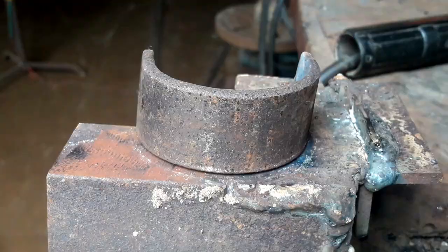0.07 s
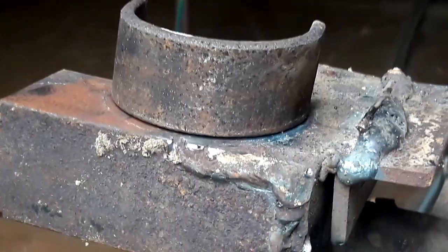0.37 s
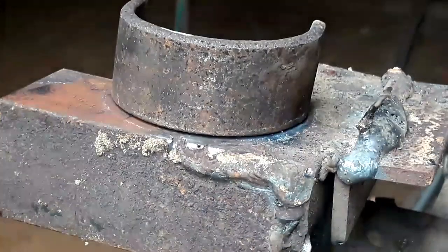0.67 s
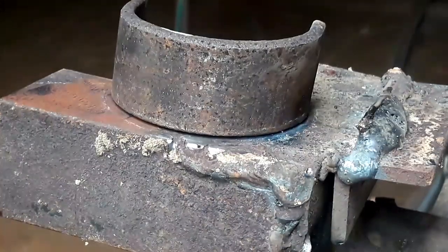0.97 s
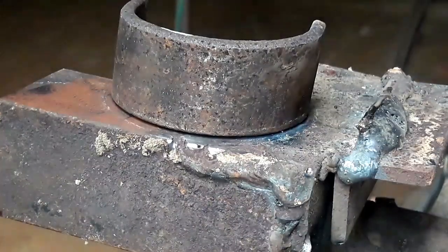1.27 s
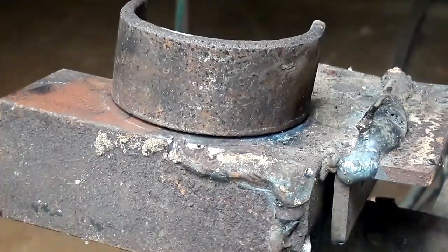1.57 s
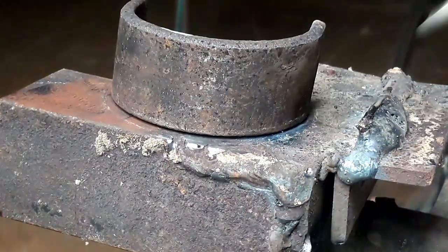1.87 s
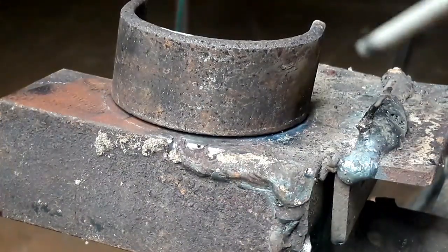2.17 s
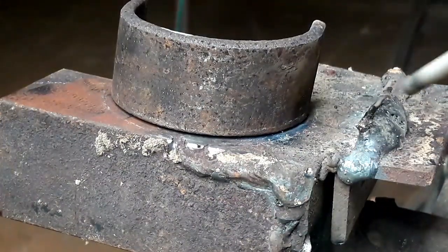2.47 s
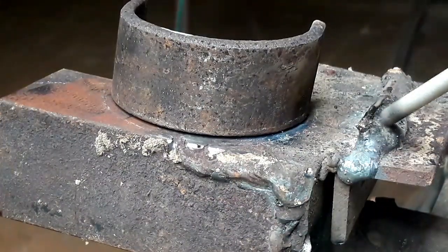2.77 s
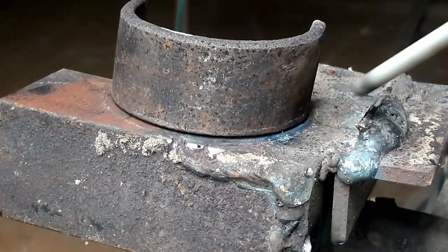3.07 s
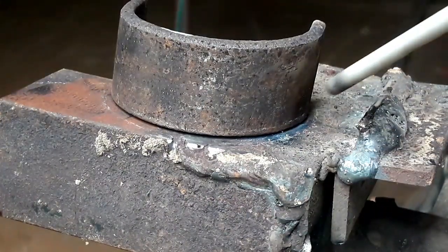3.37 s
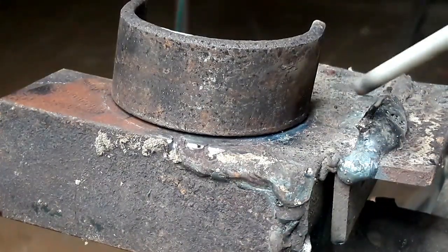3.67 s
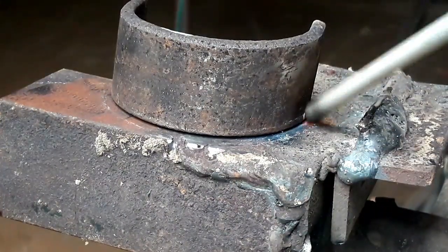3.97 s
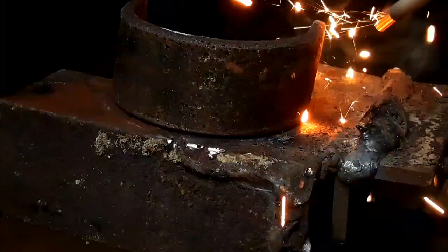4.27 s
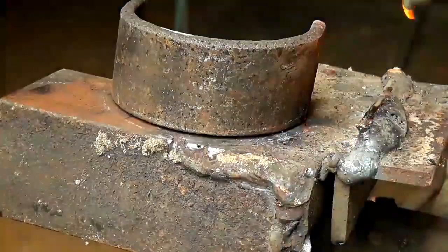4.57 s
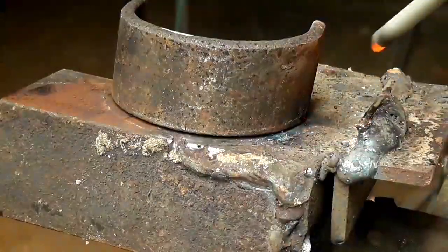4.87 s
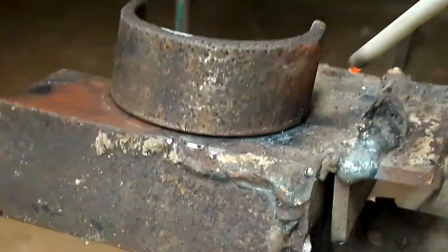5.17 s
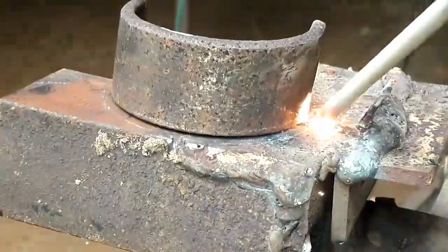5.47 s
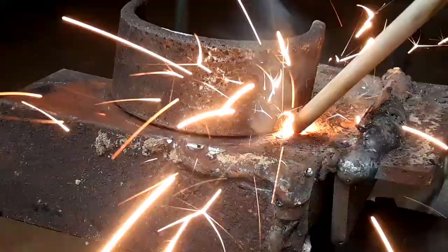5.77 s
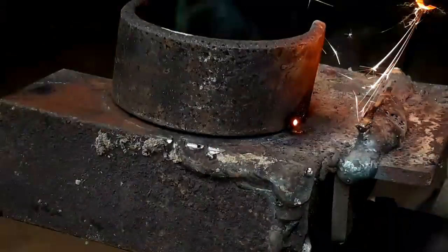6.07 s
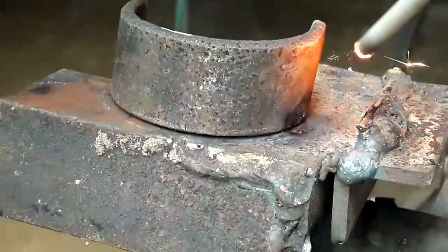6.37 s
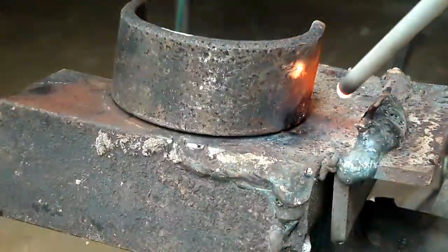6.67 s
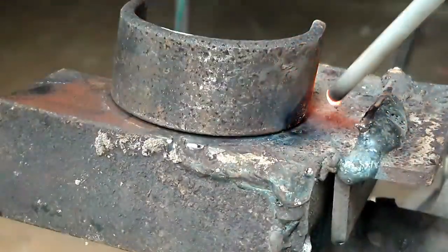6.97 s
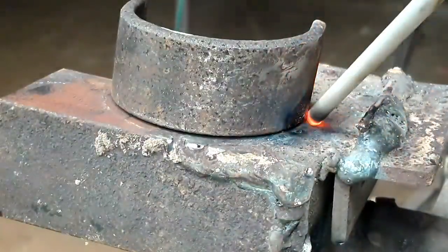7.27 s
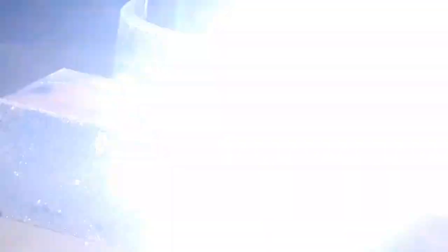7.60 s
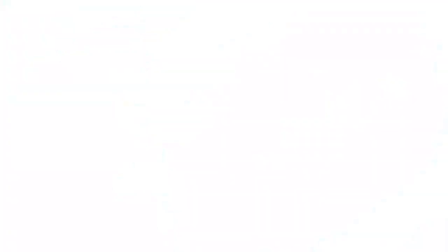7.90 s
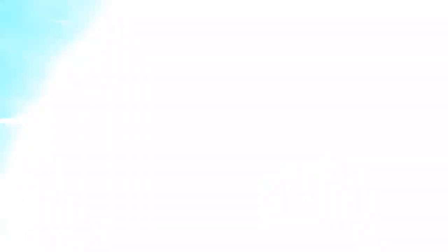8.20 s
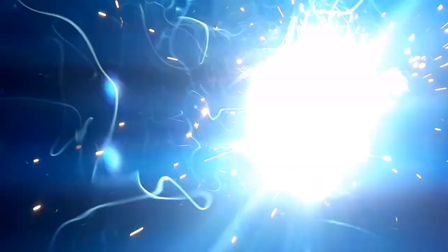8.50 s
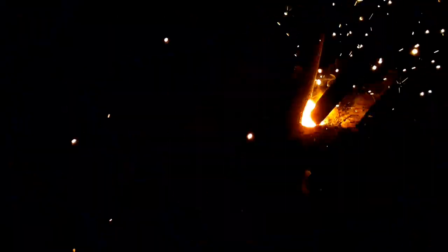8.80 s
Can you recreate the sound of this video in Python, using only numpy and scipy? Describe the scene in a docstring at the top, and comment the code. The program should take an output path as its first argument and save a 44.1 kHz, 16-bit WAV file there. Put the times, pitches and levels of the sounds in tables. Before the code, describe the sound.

Over a welding machine's fan whine and low rumble, an electrode clicks on metal, sputters twice, then crackles steadily.

```python
"""Stick welding in a workshop.

An electrode taps a steel joint; the arc flares and dies twice, then catches and sizzles.
The arc is a spray of tiny sparks, with single cracks and the thump of molten bridges blowing apart.
Behind it the welder's fan whines over a throbbing rumble and two dull bumps.
An automatic gain control sinks after each loud strike, holds for about a second and comes back."""
import sys
import numpy as np
from scipy import signal
from scipy.fft import rfft, irfft, next_fast_len
from scipy.io import wavfile
from scipy.ndimage import uniform_filter1d, minimum_filter1d

SR = 44100
rng = np.random.default_rng(int(sys.argv[2]) if len(sys.argv) > 2 else 0)


def inscribe(sig):
    """Save sig as 16-bit PCM at rate SR to the path in sys.argv[1].

    A 1-D sig is mono; a 2-D sig holds one channel per row.
    Samples are clipped to [-1, 1] before scaling.
    """
    pcm = np.round(np.clip(np.atleast_2d(sig).T, -1, 1) * 32767)
    wavfile.write(sys.argv[1], SR, pcm.astype(np.int16))


N = 398663
TIME = np.arange(N) / SR


def gain_of(db):
    """Decibels to amplitude."""
    return 10 ** (np.asarray(db) / 20)


def unit_rms(x):
    """Scales to rms 1."""
    return x / np.sqrt(np.mean(x ** 2) + 1e-20)


def envelope(points):
    """Amplitude over time from rows of time_s, level_db."""
    return gain_of(np.interp(TIME, *np.transpose(points)))


def at_hz(points, hz):
    """Interpolates on a log-frequency axis."""
    freq_hz, value = np.transpose(points)
    return np.interp(np.log(hz + 1), np.log(freq_hz + 1), value)


def add(mix, start_s, sound):
    """Mixes a sound in at start_s."""
    part = mix[round(start_s * SR):][:len(sound)]
    part += sound[:len(part)]


def filtered(x, hz, kind, order=2):
    """Butterworth low- or high-pass."""
    return signal.sosfilt(signal.butter(order, hz, kind, fs=SR, output="sos"), x)


def noise(spectrum):
    """Steady shaped noise, rms 1."""
    size = next_fast_len(N)
    shape = gain_of(at_hz(spectrum, np.fft.rfftfreq(size, 1 / SR)))
    return unit_rms(irfft(rfft(rng.standard_normal(size)) * shape, size)[:N])


def wander(rate_hz):
    """Random drift, rms 1."""
    return unit_rms(np.interp(TIME * rate_hz, np.arange(8192), rng.standard_normal(8192)))


def coloured(x, spectrum, size=2048):
    """Minimum-phase filter of energy 1; clicks keep their sharp front."""
    log_gain = np.log(gain_of(at_hz(spectrum, abs(np.fft.fftfreq(size, 1 / SR)))))
    impulse = np.fft.ifft(np.exp(np.conj(signal.hilbert(log_gain)))).real
    return signal.oaconvolve(x, impulse / np.linalg.norm(impulse))[:N]


# Workshop reverberation: freq_hz, t60_s
ROOM_DECAY = [(100, 0.19), (1000, 0.26), (3000, 0.39), (7000, 0.25), (15000, 0.24)]

def room(x, onset_s=0.0006):
    """A short diffuse tail that lasts longest in the upper mids."""
    hz, t, bins = signal.stft(rng.standard_normal(SR), SR, nperseg=256)
    decay = gain_of(-60 * t / at_hz(ROOM_DECAY, hz)[:, None])
    tail = signal.istft(bins * decay, SR, nperseg=256)[1]
    tail *= 1 - np.exp(-(np.arange(len(tail)) / SR / onset_s) ** 2)
    return signal.oaconvolve(x, tail / np.linalg.norm(tail))[:N]


# Fan air spectrum: freq_hz, density_db
AIR_SPECTRUM = [(200, 3.5), (320, -4.5), (450, -4), (600, -6), (800, -9), (1000, -8), (1500, -12),
                (1950, -17.5), (2500, -28), (4000, -35), (7400, -37.5), (8700, -52), (15000, -58)]

def fan_air(level, rush_db=1.5, hiss_db=-1.2, hiss_exponent=1.21, split_hz=2600):
    """Air rushes through the fan; its hiss grows faster than its lows."""
    flow = filtered(noise(AIR_SPECTRUM), 220, "high")
    rush = gain_of(rush_db) * level * unit_rms(filtered(flow, split_hz, "low", order=4))
    hiss = unit_rms(filtered(flow, split_hz, "high", order=4))
    return rush + gain_of(hiss_db) * level ** hiss_exponent * hiss


# Upper mids of the background hiss: time_s, boost_db
HISS_BRIGHTNESS = [(.345, -5), (.358, 5.5), (.6, 3.5), (1, 3.5)]

def brightened(hiss, band_hz=(2600, 4400)):
    """The background hiss is muffled until 0.35 s, then turns bright and settles."""
    upper_mids = signal.sosfiltfilt(signal.butter(2, band_hz, "band", fs=SR, output="sos"), hiss)
    return hiss + (envelope(HISS_BRIGHTNESS) - 1) * upper_mids


# Fan and machine tones: pitch_hz, relative_db
WHINE_TONES = [(485, -.8), (630, -16), (831, -22), (970, -18), (1110, -24), (1200, -20.5), (1386, -17.5),
               (1455, -16.5), (1941, -19)]
# Slow fade of the whine: time_s, level_db
WHINE_FADE = [(0, -43), (2.3, -42.5), (4, -44), (5.5, -44.5), (7.5, -46)]

def fan_whine(speed_drift=0.00095, drift_hz=9, flutter_db=3.0, flutter_hz=5.9):
    """The tones share the fan's drift in speed; each flutters in level on its own."""
    fan_time = np.cumsum(1 + speed_drift * wander(drift_hz)) / SR
    tones = np.zeros(N)
    for pitch_hz, relative_db in WHINE_TONES:
        level = gain_of(relative_db + flutter_db * wander(flutter_hz))
        tones += np.sqrt(2) * level * np.sin(2 * np.pi * pitch_hz * fan_time)
    return envelope(WHINE_FADE) * tones


# Background levels: time_s, air_db, rumble_db
SHOP_LEVELS = [(0, -41.5, -40.5), (.34, -40.5, -45), (.37, -39.5, -35), (.55, -39.5, -35),
               (.95, -43.5, -36), (1.32, -43, -35), (1.55, -44.5, -39.5), (3.8, -46.5, -42),
               (4.05, -46, -37), (4.4, -46.5, -41.5), (5.5, -47.5, -40.5), (6.7, -46.5, -42),
               (7.6, -46, -41), (8.15, -45, -39), (9.04, -46, -47.5)]
# Rumble spectrum: freq_hz, density_db
RUMBLE_SPECTRUM = [(20, -44.5), (40, -23.5), (60, -10.5), (80, -2), (105, 4), (130, 1.5), (170, -8.5),
                   (230, -10.5), (320, -27.5), (600, -55.5)]

def workshop(throb_db=0.6, throb_hz=21):
    """The welder's fan over a throbbing rumble."""
    levels = np.array(SHOP_LEVELS)
    hiss = brightened(fan_air(envelope(levels[:, [0, 1]])))
    rumble = unit_rms(noise(RUMBLE_SPECTRUM) * gain_of(throb_db * wander(throb_hz)))
    return hiss + envelope(levels[:, [0, 2]]) * rumble + fan_whine()


# Dull bumps: centre_s, level_db, half_length_s
BENCH_BUMPS = [(0.595, -36.5, 0.053), (4.048, -39, .035)]

def bumps(low_hz=150, high_hz=330):
    """Soft swells of low noise, as of the bench being handled."""
    swell = sum(gain_of(db) * np.exp(-((TIME - s) / half_s) ** 2) for s, db, half_s in BENCH_BUMPS)
    lows = filtered(filtered(rng.standard_normal(N), low_hz, "high"), high_hz, "low", order=4)
    return swell * unit_rms(lows)


# Rod touching steel: start_s, strength_db, drag_s
ROD_TAPS = [(2.683, -38, 0.0049), (2.8, -50, .005), (4.009, -42.5, .0039), (4.023, -37.5, 0.0028),
            (4.047, -40.5, 0.0032), (5.5108, -39.5, 0.0016), (5.574, -49.5, 0.049), (7.215, -47.5, 0.0035),
            (7.615, -43.5, 0.014)]
# Rod modes: pitch_hz, relative_db, t60_s
ROD_MODES = [(2460, -1, .06), (3200, -3, .04), (4480, 0, .04), (5420, -3, .04), (5800, -1, .05),
             (6550, -8, .03), (7500, -9, .03)]

def rod_taps(gain_db=-1.5, slips_per_s=3000, knock_hz=230, knock_width_hz=90):
    """Each touch is a run of tiny slips over the scale; they ring the rod and knock the bench."""
    contact, t = np.zeros(N), np.arange(8192) / SR
    for start_s, strength_db, drag_s in ROD_TAPS:
        add(contact, start_s, gain_of(strength_db) * np.exp(-t / drag_s))
    slips = contact * unit_rms(rng.standard_normal(N) * (rng.random(N) < slips_per_s / SR))
    ring = sum(gain_of(db - 60 * t / t60_s) * np.sin(2 * np.pi * hz * t) for hz, db, t60_s in ROD_MODES)
    knock = np.exp(-np.pi * knock_width_hz * t) * np.sin(2 * np.pi * knock_hz * t)
    response = ring / np.linalg.norm(ring) + knock / np.linalg.norm(knock)
    grit = 2 * filtered(filtered(slips, 2500, "high"), 5800, "low", order=4)
    return gain_of(gain_db) * (signal.oaconvolve(slips, response)[:N] + grit)


# Molten bridges bursting: start_s, peak_db, fade_s
BRIDGE_BURSTS = [(4.1942, 1.5, .0013), (5.8032, -13, 0.003), (7.6925, -10, 0.0038), (7.9197, 4, 0.0047)]

def thumps(swing_hz=105, front_hz=2600, crack_shove_db=-18, crack_shove_s=0.00026):
    """Bursting bridges and loud cracks shove the air; the pressure swings back and settles."""
    out, t = np.zeros(N), np.arange(2048) / SR
    omega = 2 * np.pi * swing_hz
    swing = signal.bilinear([1, 0, 0], [1, omega, omega ** 2], SR)
    shoves = [(s, db + body_db + crack_shove_db, crack_shove_s) for s, db, body_db in LOUD_CRACKS]
    for start_s, peak_db, fade_s in BRIDGE_BURSTS + shoves:
        push = filtered(signal.lfilter(*swing, np.exp(-t / fade_s)), front_hz, "low")
        add(out, start_s, -gain_of(peak_db) * push / abs(push).max())
    return out


# Workpiece resonances: pitch_hz, width_hz, gain_db
STEEL_MODES = [(2650, 40, -6), (3530, 45, -17.5), (6300, 200, -14), (12240, 560, -6), (14300, 200, -10),
               (14800, 200, -5), (13200, 230, -3.5), (15800, 320, 2), (15150, 200, -3)]
# Workpiece and bench reflections: delay_s, gain
BENCH_ECHOES = [(.00157, 0.091), (.00197, 0.1), (.00209, 0.17), (.00228, .12), (.0044, .1)]

def bench(x, direct_db=-0.35):
    """The steel around the arc rings briefly and reflects each spark within milliseconds."""
    rung = gain_of(direct_db) * x
    for pitch_hz, width_hz, gain_db in STEEL_MODES:
        mode = signal.iirpeak(pitch_hz, pitch_hz / width_hz, fs=SR)
        rung += gain_of(gain_db) * signal.lfilter(*mode, x)
    out = rung.copy()
    for delay_s, gain in BENCH_ECHOES:
        add(out, delay_s, gain * rung)
    return out


def cracks(rows, spike_s, spray, spray_s=0.0032, gain_db=4, body_hz=2600):
    """A large spark is one sharp pressure spike and a brief spray of small ones."""
    out, t = np.zeros(N), np.arange(512) / SR
    for start_s, strength_db, body_db in rows:
        decay = 0.35 * np.exp(-t / spike_s) + spray * np.exp(-t / spray_s)
        spike = rng.standard_normal(len(t)) * decay
        spike[0] = 1
        spike /= np.linalg.norm(spike)
        spike += (gain_of(body_db) - 1) * filtered(spike, body_hz, "low", order=1)
        add(out, start_s, gain_of(strength_db + gain_db) * spike)
    return filtered(out, 242, "high", order=1)


def spits(burn, rate_per_s=55, offset_db=20.5, spread_db=5.5, body_spread_db=4):
    """Smaller cracks come at random while the arc burns, and grow with it."""
    onsets = np.flatnonzero((rng.random(N) < rate_per_s / SR) & (burn > 0))
    size, body = 2 * rng.random((N, 2))[onsets].T - 1
    strength_db = 20 * np.log10(burn[onsets]) + offset_db + spread_db * size
    return cracks(zip(onsets / SR, strength_db, body_spread_db * body), spike_s=0.0001, spray=0.035)


def sizzle(burn, extra_body, sparks_per_s=8000, spread_db=3.0, flicker_db=2.5, flicker_hz=500,
           gas_db=-8, body_hz=2800):
    """Tiny sparks of uneven size fly in clumps over the hiss of hot gas."""
    sizes = gain_of(spread_db * np.minimum(rng.exponential(1, N), 5)) * rng.choice([-1, 1], N)
    sparks = unit_rms(sizes * (rng.random(N) < sparks_per_s / SR))
    gas = gain_of(gas_db) * rng.standard_normal(N)
    spray = unit_rms((sparks + gas) * gain_of(flicker_db * wander(flicker_hz)))
    return spray * burn + filtered(spray * extra_body, body_hz, "low", order=1)


# Brief flares: start_s, end_s, level_db, sag_db (negative swells), body_db (lows and mids)
ARC_FLARES = [(4.104, 4.233, -24, 10, -10), (4.273, 4.294, -24.5, 7, 7.5), (5.547, 5.727, -56.5, -3, -16),
              (5.742, 5.811, -25.5, 3, 3.5), (5.865, 5.918, -22.5, 9, 7.5), (7.651, 7.699, -18, 20.5, -14),
              (7.761, 7.779, -24.5, 2, -11), (7.864, 7.904, -35, -3.5, -6), (7.915, 8.077, -25, 1.5, 4),
              (8.205, 8.235, -24.5, 6.5, -18), (8.755, 8.808, -23.5, -2, -1.5),
              (8.817, 8.854, -24, -1.5, -1), (8.9, 8.909, -20.5, -4.5, -6), (8.928, 8.972, -26, 7, -8),
              (8.993, 9.026, -27.5, -1, -6.5)]
# Arc holding: time_s, level_db, body_db
ARC_HOLD = [(8.249, -27, 3), (8.28, -24, 5.5), (8.41, -28, 14.5), (8.46, -16, 0.5), (8.5, -29.5, 8),
            (8.6, -26, 4.5), (8.74, -25, 2)]

def arc_envelopes(quench_s=0.00044):
    """Amplitudes of the arc and its extra body: a steady burn, and flares that are quenched."""
    time_s, hold_db, hold_body_db = np.transpose(ARC_HOLD)
    burn = gain_of(np.interp(TIME, time_s, hold_db)) * (TIME > time_s[0]) * (TIME < time_s[-1])
    extra_body = burn * (gain_of(np.interp(TIME, time_s, hold_body_db)) - 1)
    for start_s, end_s, level_db, sag_db, body_db in ARC_FLARES:
        length_s = end_s - start_s
        t = np.arange(0, length_s + 10 * quench_s, 1 / SR)
        quench = np.exp(-np.maximum(t - length_s, 0) / quench_s)
        flare = gain_of(level_db - sag_db * np.minimum(t / length_s, 1)) * quench
        add(burn, start_s, flare)
        add(extra_body, start_s, flare * (gain_of(body_db) - 1))
    return burn, extra_body


# Loudest single sparks: start_s, strength_db, body_db
LOUD_CRACKS = [(4.1053, 0, 2.5), (4.1273, -2.5, -15), (4.205, -8.5, 16), (4.219, -2, -5), (4.2262, 2.5, -6),
               (4.288, -9, 17.5), (5.6752, -11.5, 2), (5.7372, -6, 10), (5.764, -3, -3), (5.8033, -3.5, 1),
               (5.874, -2.5, -5), (5.9044, -11, 18), (5.9204, -12.5, 15.5), (7.6521, -4.5, 11.5),
               (7.6824, 0.5, -17), (7.6918, -0.5, -4), (7.7776, -6, 3), (7.8944, 1, 0.5), (7.9071, 4, -7),
               (7.945, 1.5, 10.5), (7.9676, 9, -3), (7.986, -2, -2), (8.0046, 3, -8), (8.0454, 1, -3.5),
               (8.218, 5, -5), (8.2656, 10, 0), (8.4077, 6.5, -2), (8.3371, 4, -3), (8.6651, 3, -2),
               (8.692, 6.5, 1.5), (8.7563, -1, -1), (8.8196, 4.5, -4), (8.9033, 3, -0.5), (8.9289, -3, 4),
               (8.9412, 5, 2), (9.012, 7.5, -9)]
# Spark colour: freq_hz, relative_db
ARC_SPECTRUM = [(60, -19.5), (150, -9.5), (900, 0), (1500, 0), (2200, -1.5), (2650, -0.5), (2950, -5.5),
                (3700, 1.5), (5200, 0), (6400, 3.5), (7600, 3.5), (8700, -9), (10200, -3.5), (12000, 1),
                (13000, -1.5), (15200, -0.5)]

def welding_arc():
    """Sizzle, cracks and spits share one colour and ring the steel."""
    burn, extra_body = arc_envelopes()
    sparks = sizzle(burn, extra_body) + cracks(LOUD_CRACKS, spike_s=0.00078, spray=0.066) + spits(burn)
    return bench(coloured(sparks, ARC_SPECTRUM))


def scene(arc_send_db=-11, thump_send_db=-15, rod_send_db=-5):
    """Arc and rod close by in a workshop, mono."""
    shop, thump, rod, arc = workshop(), thumps(), rod_taps(), welding_arc()
    send = gain_of(arc_send_db) * arc + gain_of(thump_send_db) * thump + gain_of(rod_send_db) * rod
    return (shop + bumps() + rod + thump + arc + room(send))[None]


def gain_control(x, threshold_db=-30, slope=0.94, sense_s=0.041, hold_s=0.94, glide_s=0.32):
    """Gain glides down with the loudest recent excess, and back up when the hold runs out."""
    power = uniform_filter1d((x ** 2).mean(0), round(sense_s * SR))
    power_db = 10 * np.log10(abs(power) + 1e-12)
    wanted_db = -slope * np.maximum(power_db - threshold_db, 0)
    half_hold = round(hold_s * SR / 2)
    held_db = minimum_filter1d(wanted_db, 2 * half_hold + 1, mode="constant", origin=half_hold)
    step = 1 / (glide_s * SR)
    return x * gain_of(signal.lfilter([step], [1, step - 1], held_db))


def record(dry, cutoff_hz=15500):
    """Gain control, then a steep low-pass."""
    low_pass = signal.firwin(301, cutoff_hz, window=("kaiser", 8), fs=SR)
    return signal.oaconvolve(gain_control(dry), low_pass[None], "same")


dry = scene()
out = record(dry)
inscribe(out)
```